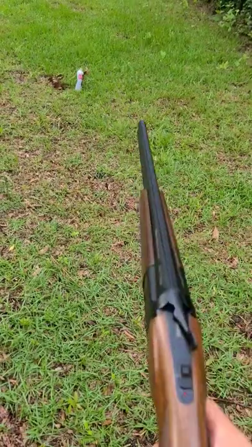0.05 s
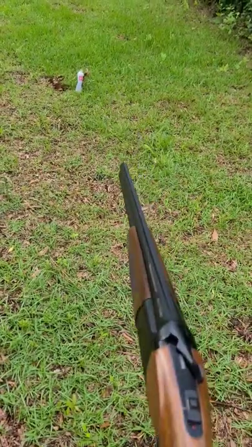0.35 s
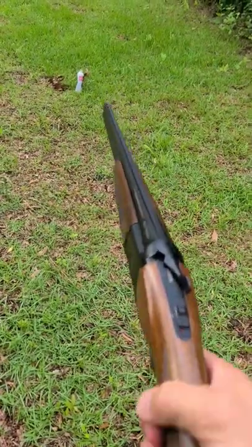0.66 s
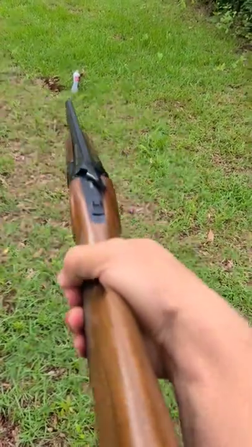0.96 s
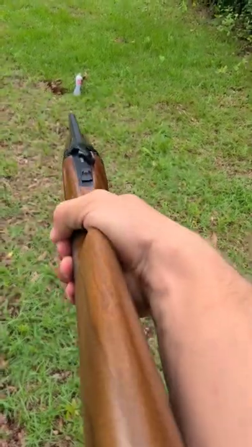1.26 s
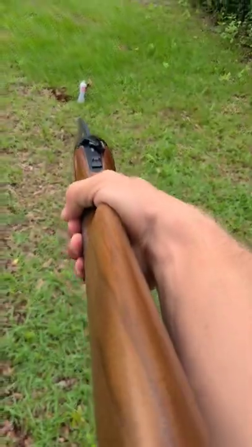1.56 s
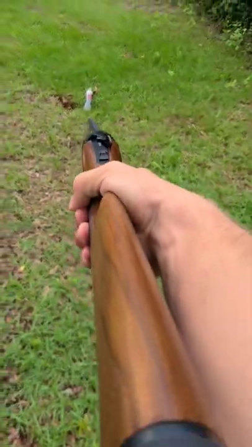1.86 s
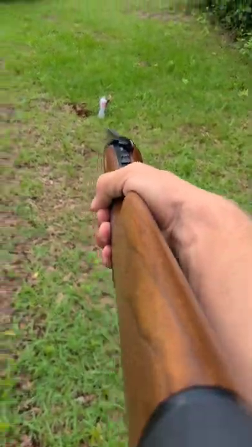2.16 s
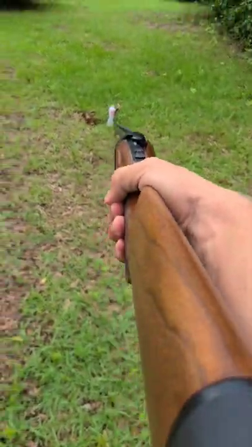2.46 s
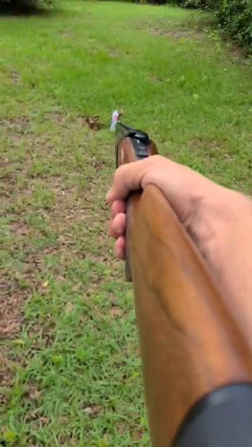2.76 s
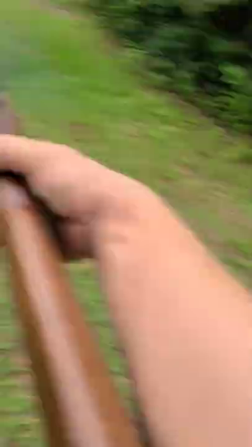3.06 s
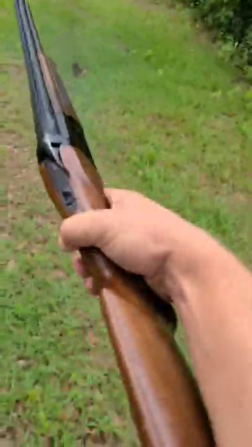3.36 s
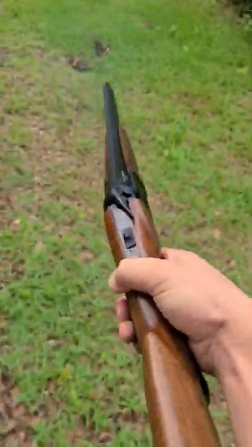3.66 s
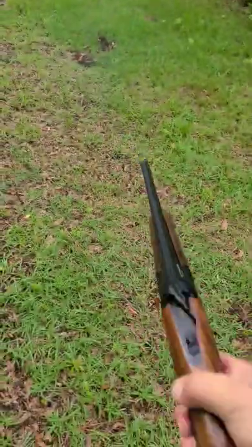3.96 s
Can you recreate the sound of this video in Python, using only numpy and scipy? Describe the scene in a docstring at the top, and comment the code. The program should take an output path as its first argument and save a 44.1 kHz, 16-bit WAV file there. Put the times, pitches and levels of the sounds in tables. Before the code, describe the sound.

A shotgun fires once after faint handling knocks, echoing off trees while cicadas drone.

```python
"""A shotgun fires once, close up, on a quiet lawn ringed by droning cicadas.
Before the shot a far engine hums, the gun knocks and squeaks as it is shouldered, and a bird chips.
The blast is a crackling, overloaded roar of noise. It slaps back from the trees and rolls away
while shreds patter into the grass; the gain control clamps on it and leaves the insects ducked."""
import sys
import numpy as np
from scipy import signal
from scipy.fft import rfft, irfft
from scipy.io import wavfile
from scipy.ndimage import uniform_filter1d

SR = 44100
rng = np.random.default_rng(int(sys.argv[2]) if len(sys.argv) > 2 else 0)


def to_wav(s):
    """Save 16-bit WAV."""
    ch = np.atleast_2d(s).T  # columns
    pcm = np.round(np.clip(ch, -1, 1) * 32767)  # PCM
    wavfile.write(sys.argv[1], SR, pcm.astype(np.int16))


N = 176400
T = np.arange(N) / SR
FREQS = np.maximum(np.arange(N // 2 + 1) * SR / N, 1)
SHOT_S = 3.063

# stereo placement of the blast and its tail: f/Hz, left minus right/dB
SHOT_BALANCE = [(60, 1.5), (200, -5), (600, -1), (1300, -2.5), (2600, -2), (4500, 2), (6500, 3), (9000, 1),
                (14000, 3.5)]


def from_db(db):
    """Decibels to gain."""
    return 10 ** (np.asarray(db) / 20)


def rms_one(x):
    """Scale to unit rms."""
    return x / np.sqrt(np.mean(x ** 2) + 1e-20)


def at_hz(points, hz):
    """Read a table on a log-frequency axis."""
    f, value = np.transpose(points)
    return np.interp(np.log(hz), np.log(f), value)


def pan(db):
    """Constant-power stereo gains, the left db above the right."""
    gains = from_db(np.array([[.5], [-.5]]) * db)
    return gains / np.sqrt(np.mean(gains ** 2, axis=0))


def drift(rate_hz):
    """Smooth random modulation of unit rms, rolling off above rate_hz."""
    return rms_one(irfft(rfft(rng.standard_normal(N)) / (1 + (FREQS / rate_hz) ** 2), N))


def noise(colour, correlation=None, balance=None):
    """Stereo noise shaped by curves of level (dB per Hz), left-right correlation and balance."""
    mid, side = rfft(rng.standard_normal((2, N)))
    alike = np.clip(at_hz(correlation, FREQS), -1, 1) if correlation else 0
    stereo = np.sqrt(1 + alike) * mid + np.sqrt(1 - alike) * side * np.array([[1], [-1]])
    placement = pan(at_hz(balance, FREQS)) if balance else 1
    return irfft(stereo * placement * from_db(at_hz(colour, FREQS)), N) * np.sqrt(SR) / 2


def bands(x):
    """Overlapping octave bands that add up to the whole: (centre in Hz, signal)."""
    centres = np.geomspace(50, 14000, 9)
    spectrum = rfft(x)
    for hz, weights in zip(centres, np.eye(len(centres))):
        yield hz, irfft(spectrum * np.interp(np.log(FREQS), np.log(centres), weights), N)


def decay(age, t60):
    """Gain 1 until age 0, then a fall of 60 dB every t60 seconds."""
    return np.exp(-np.log(1000) * np.maximum(age, 0) / t60)


def engine():
    """A far engine hums on two partials that waver in pitch and level."""
    # hum partials: f/Hz, rms level/dB
    partials = [(93, -53.5), (184, -63.5)]
    wandering_time = np.cumsum(1 + .04 * drift(11.54)) / SR
    hum = 0
    for hz, db in partials:
        amplitude = np.sqrt(2) * from_db(db + 2.5 * drift(9.7))
        hum += amplitude * np.sin(2 * np.pi * hz * wandering_time)
    return hum * pan(db=-3.5)


def air():
    """Still outdoor air: a soft rumble, narrow in the bass and wide on top."""
    # air bed: f/Hz, level/dB per Hz
    colour = [(20, -94), (31, -76), (42, -69.5), (70, -71), (115, -72.5), (150, -78.5), (230, -79.5),
              (290, -85), (420, -83.5), (550, -87), (780, -88), (950, -95), (1300, -94.5), (2100, -106.5),
              (2800, -103.5), (3500, -110), (4500, -113), (8500, -120), (15000, -115)]
    # stereo likeness: f/Hz, correlation (capped at 1)
    correlation = [(130, 1.1), (290, 0.83), (640, 0.73), (1400, 0.01)]
    # placement: f/Hz, left minus right/dB
    balance = [(50, -2.5), (130, -1.5), (1800, -3), (3000, 1)]
    return noise(colour, correlation, balance)


def cicadas():
    """So many insects that their pulses merge into one throbbing ring."""
    # main ring and overtones: f/Hz, level/dB per Hz
    ring = [(4600, -122), (5900, -103), (6250, -89.5), (6560, -74), (6820, -73), (7150, -86.5),
            (7600, -106), (8500, -130), (10100, -125), (10600, -111), (11300, -122), (12600, -114),
            (13400, -102), (14100, -111), (15500, -122)]
    # placement: f/Hz, left minus right/dB
    balance = [(5000, -5.5), (6800, 6.5), (10600, 6), (13000, -2.5)]
    throb_db = 1.3
    return noise(ring, balance=balance) * from_db(throb_db * drift(35))


def gun_handling():
    """The stock knocks and metal ticks in the hands, last of all at the trigger."""
    # contacts: t/s, knock level/dB, tick level/dB, t60/s
    contacts = [(0.018, -46.5, -82, 0.033), (0.201, -53, -58, 0.053), (0.291, -47, -45.5, 0.04),
                (0.314, -47, -58, 0.09), (.36, -51.5, -57, .03), (.611, -46, -55, 0.035),
                (0.667, -53.5, -65, 0.12), (0.718, -57.5, -60, 0.17), (.804, -56, -64, 0.035),
                (1.318, -49.5, -60, 0.021), (2.23, -73, -58, .025), (3.038, -48, -60, 0.03),
                (3.048, -49.5, -59, 0.061)]
    # knock on the stock: f/Hz, relative level/dB
    knock_colour = [(300, -27), (800, 1), (1500, -0.5), (2400, -4.5), (3500, -12), (7000, -24.5)]
    # tick of metal: f/Hz, relative level/dB
    tick_colour = [(1500, -22), (3500, -2), (5200, -1), (8500, -6.5), (13000, 7), (16000, -1.5)]
    knock, tick = rms_one(noise(knock_colour)), rms_one(noise(tick_colour))
    out = 0
    for start, knock_db, tick_db, t60 in contacts:
        envelope = (T >= start) * decay(T - start, t60)
        out += envelope * (from_db(knock_db) * knock + from_db(tick_db) * tick)
    return out * pan(db=-4.5)


def grip_squeak():
    """The grip rubs once: a rough, rising squeak over a hiss."""
    # rubbing hiss: f/Hz, level/dB per Hz
    rub = [(900, -125), (1300, -79), (2600, -91), (3600, -95), (6000, -91), (8500, -103), (13000, -99),
           (16000, -101)]
    start, length_s, roughness = .28, 0.0546, 0.055
    progress = np.clip((T - start) / length_s, 0, 1)
    hz = np.interp(progress, [0, 1], [1680, 2153]) * (1 + roughness * drift(410))
    tone = from_db(-53) * np.sin(2 * np.pi * np.cumsum(hz) / SR)
    return np.sin(np.pi * progress) * (tone + noise(rub)) * pan(db=-4.5)


def bird():
    """Short raspy upward chips, smeared by the trees."""
    # calls: t/s, dry peak level/dB
    calls = [(.735, -61), (1.695, -62), (2.844, -60)]
    length_s, wet_gain = .02, 1.9
    rasp = 1 + 0.15 * drift(1200)
    chips = np.zeros(N)
    for start, db in calls:
        progress = np.clip((T - start) / length_s, 0, 1)
        hz = np.interp(progress, [0, 1], [6000, 6380]) * rasp
        chips += from_db(db) * np.sin(np.pi * progress) * np.sin(2 * np.pi * np.cumsum(hz) / SR)
    trees = rms_one(rng.standard_normal((2, N)) * decay(T, t60=0.78)) / np.sqrt(N)
    reverb = signal.fftconvolve(chips[None], trees[:, :SR], axes=1)[:, :N]
    return (chips + wet_gain * reverb) * pan(db=7)


def blast():
    """The shot's dense, crackling roar builds in a few hundredths of a second, holds and collapses."""
    # overloaded roar: f/Hz, level/dB per Hz
    colour = [(20, -56), (50, -25), (110, -30), (280, -27), (420, -30.5), (520, -31), (800, -32),
              (1300, -30.5), (1800, -36.5), (2450, -33.5), (3200, -38), (4500, -41), (6300, -39.5),
              (8000, -45), (12000, -39.5), (16000, -43)]
    # stereo likeness: f/Hz, correlation
    correlation = [(60, 0.48), (150, 0.73), (400, 0.61), (950, .25), (2400, 0.048)]
    # attack on each side, mostly faster on the right: f/Hz, rise time/s
    attack_left = [(60, .018), (200, 0.033), (700, .035), (1500, 0.041), (4000, 0.027), (7000, 0.017),
                   (12000, 0.033)]
    attack_right = [(60, 0.016), (200, 0.022), (700, 0.017), (1500, .014), (2600, 0.0078), (4500, 0.035),
                    (12000, 0.016)]
    # start of the collapse: f/Hz, t/s after the shot
    hold = [(60, 0.11), (500, 0.087), (1500, 0.077), (5000, 0.08), (12000, 0.053)]
    # length of the collapse: f/Hz, t60/s
    collapse = [(60, 0.14), (500, 0.18), (1500, 0.24), (5000, 0.37), (12000, 0.32)]
    start_db, crackle_db = -34, 1.0
    age, roar = T - SHOT_S, 0
    for hz, band in bands(noise(colour, correlation, SHOT_BALANCE)):
        attack_s = np.array([[at_hz(attack_left, hz)], [at_hz(attack_right, hz)]])
        attack = from_db(start_db * np.clip(1 - age / attack_s, 0, 1))
        roar += band * attack * decay(age - at_hz(hold, hz), at_hz(collapse, hz))
    gate = np.clip(age / 0.001, 0, 1)
    return roar * gate * from_db(crackle_db * drift(300))


def rolling_tail():
    """Countless far echoes swell and roll away in lumps, the treble dying first."""
    # tail at its crest: f/Hz, level/dB per Hz
    colour = [(20, -62), (45, -45), (80, -35.5), (170, -34.5), (280, -33), (410, -36), (560, -39),
              (760, -38), (1250, -46), (2000, -48), (3000, -50.5), (4000, -58.5), (6300, -53.5),
              (8000, -60.5), (15500, -60)]
    # stereo likeness: f/Hz, correlation
    correlation = [(60, 0.91), (150, 1), (380, 0.31), (950, -0.085)]
    # ring-out: f/Hz, t60/s
    ring_out = [(80, 1.54), (300, 1.045), (700, 1.67), (1300, 2.34), (2800, 1.32), (4200, 1.41),
                (8000, 0.7), (15000, 0.65)]
    crest_s, swell_db_per_s = 3.2436, 78
    age, roll = T - crest_s, 0
    for hz, band in bands(noise(colour, correlation, SHOT_BALANCE)):
        lump_db = 2.07 * min(1, 1500 / hz)  # smoother in the treble
        roll += band * decay(age, at_hz(ring_out, hz)) * from_db(lump_db * drift(45))
    swell = from_db(swell_db_per_s * np.minimum(age, 0))
    fade_in = np.clip((T - SHOT_S) / 0.038, 0, 1)
    return roll * swell * fade_in


def tree_slaps():
    """The N-shaped muzzle pulse comes back dulled from the nearest trees."""
    # slapbacks: t/s, peak level before dulling/dB, pulse length/s
    slaps = [(3.1435, 14.5, 0.0015), (3.1505, 10.5, 0.0016), (3.1555, 5, 0.0012), (3.215, 4, 0.0043),
             (3.254, 5.5, 0.0032), (3.282, -6, 0.0066)]
    pulses = np.zeros(N)
    for start, db, length_s in slaps:
        progress = (T - start) / length_s
        pulses += from_db(db) * (1 - 2 * progress) * ((progress >= 0) & (progress < 1))
    dulling = signal.butter(2, 1380, fs=SR, output="sos")
    return signal.sosfilt(dulling, pulses + 1e-18) * pan(db=-10)


def far_echoes():
    """Far tree lines answer in soft swells, each narrowed to one band by its way through the trees."""
    # swells: crest t/s, spread/s, centre f/Hz, crest level/dB per Hz
    swells = [(3.265, 0.032, 257, -33.5), (3.33, 0.095, 760, -39.5), (3.53, 0.032, 770, -42),
              (3.55, 0.11, 1220, -49), (3.72, 0.089, 765, -54), (3.88, 0.11, 1210, -56.5),
              (3.8, .04, 2970, -81)]
    width_oct = 0.22  # from the centre to 10 dB down
    out = 0
    for crest_s, spread_s, hz, db in swells:
        colour = [(hz * 2 ** (k * width_oct), db - 10 * k * k) for k in range(-3, 4)]
        out += noise(colour) * np.exp(-.5 * ((T - crest_s) / spread_s) ** 2)
    return out * pan(db=-2)


def debris():
    """Shreds come down in the grass: a faint grainy patter that builds, flurries and lingers."""
    # patter: f/Hz, level/dB per Hz
    colour = [(2000, -100), (3400, -88), (4300, -88.5), (5200, -95), (9000, -105.5), (12000, -94),
              (15500, -95)]
    flurry_s, spread_s, grain_db = 3.81, 0.047, 1
    flurry = np.exp(-.5 * ((T - flurry_s) / spread_s) ** 2)
    lingering = from_db(1) * np.clip((T - SHOT_S) / (flurry_s - SHOT_S), 0, 1) ** 2
    return noise(colour) * (flurry + lingering) * from_db(grain_db * drift(200))


def scene():
    """The lawn, the gun and the aftermath of its shot."""
    lawn = engine() + air() + cicadas() + bird()
    gun = gun_handling() + grip_squeak() + blast()
    return lawn + gun + rolling_tail() + tree_slaps() + far_echoes() + debris()


def record(dry):
    """Gain control clamps just ahead of the blast and lets go slowly; peaks round off, the top is cut."""
    threshold_db, release_db_per_s, look_ahead_s = -9.5, 3, 0.0047
    ceiling, cutoff_hz = 1.15, 15700
    power = uniform_filter1d(np.mean(dry ** 2, axis=0), size=880)  # 20 ms window
    level_db = 10 * np.log10(np.maximum(power, 1e-12))
    over_db = np.maximum(np.interp(T + look_ahead_s, T, level_db) - threshold_db, 0)
    release_db = release_db_per_s * T
    duck_db = np.maximum.accumulate(over_db + release_db) - release_db
    rounded = ceiling * np.tanh(dry * from_db(-duck_db) / ceiling)
    return signal.sosfilt(signal.ellip(12, .1, 80, cutoff_hz, fs=SR, output="sos"), rounded)


dry = scene()
out = record(dry)
to_wav(out)
```